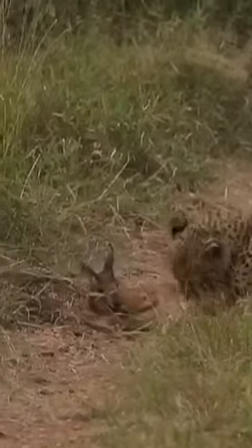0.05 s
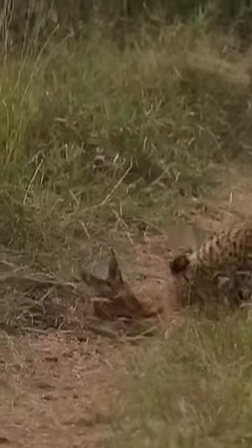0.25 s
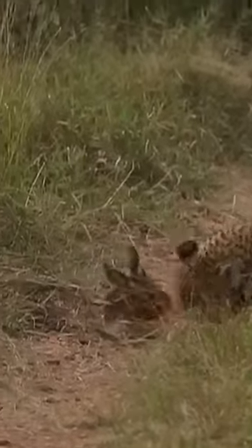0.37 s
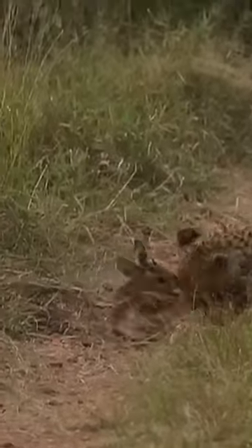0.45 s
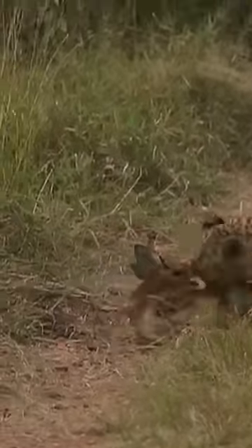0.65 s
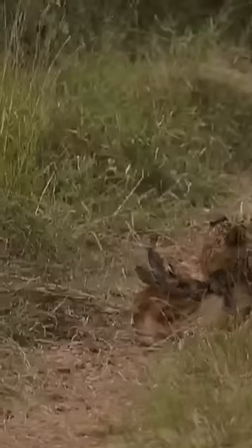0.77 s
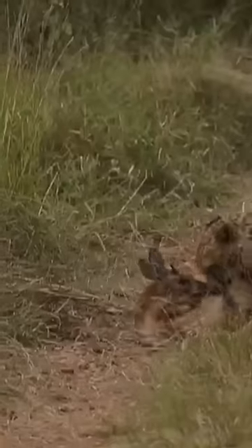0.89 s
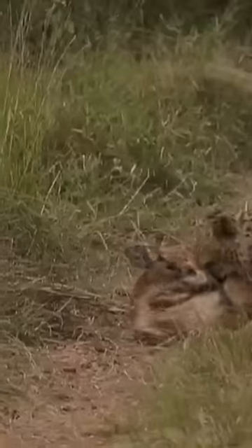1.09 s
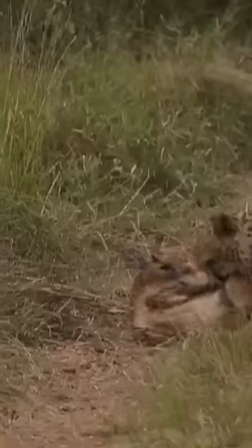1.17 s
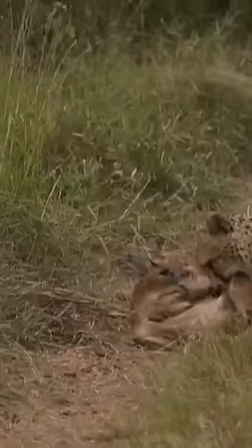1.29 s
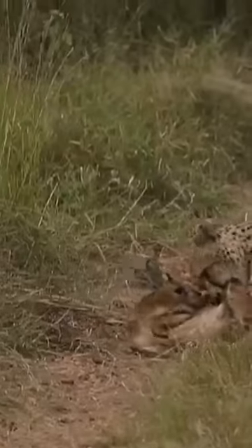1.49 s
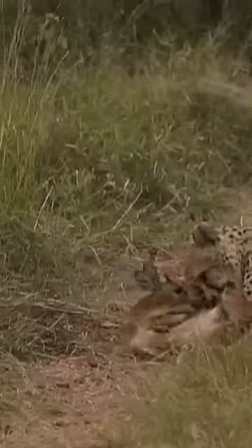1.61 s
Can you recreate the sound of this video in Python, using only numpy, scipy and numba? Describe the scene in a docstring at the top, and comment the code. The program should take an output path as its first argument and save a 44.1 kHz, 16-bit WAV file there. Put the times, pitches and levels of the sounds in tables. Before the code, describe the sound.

One long, piercing bleat from a small antelope ends raspily amid faint rustles and scuffs.

```python
"""Dry grass rustles over faint outdoor air; then a small antelope, seized by a big cat, gives one
long, loud distress bleat. Its pitch rises, holds, cracks upward and sags, and it ends in a rasp.
The voice is a source and a filter: pulses from the vocal folds excite throat resonances that move
as the mouth opens and closes. The struggle's rustle and closing scuffs are dense trains of tiny
impacts, and the vegetation scatters a short wash of echoes."""
import sys
import numpy as np
from scipy import signal
from scipy.fft import rfft, irfft
from scipy.io import wavfile
from scipy.ndimage import uniform_filter1d
from numba import njit

SR = 44100
rng = np.random.default_rng(int(sys.argv[2]) if len(sys.argv) > 2 else 0)


def store_wav(level_fs):
    """Save 16-bit WAV to argv[1]."""
    pcm = np.round(np.clip(np.atleast_2d(level_fs), -1, 1) * 32767)
    wavfile.write(sys.argv[1], SR, pcm.T.astype(np.int16))


N = 72765
T = np.arange(N) / SR

# Spectra of the air, grass and grit. Each row: frequency in Hz, relative level in dB.
AIR_SPECTRUM = [(25,-20),(60,-15),(110,-12),(200,-3),(450,-4),(700,-8),(1000,-7.5),(1400,-9.5),(3000,-32),(5000,-44),(8000,-21),(12000,-30)]
GRASS_SPECTRUM = [(120, -48), (200, -8.5), (903, -5), (984, 5.5), (1460, -0.5), (1560, -9), (1890, 1.5),
                  (3740, -2.5), (4600, -8), (8230, -7), (12000, -31.5), (15600, -57), (22000, -120)]
GRIT_SPECTRUM = [(120, -40), (200, -13), (589, -11), (1070, -2.5), (1820, -0.5), (2400, -8), (3210, 1.5),
                 (4080, -9.5), (8970, -11), (12000, -20.5), (15600, -60.5), (22000, -120)]
# Envelope of the rustling grass. Each row: time in seconds, level in dB.
RUSTLE_LEVEL = [(0,-56.5),(0.06,-58.5),(0.085,-50),(0.115,-63.5),(0.15,-51.5),(0.4,-70),(0.68,-60),(0.75,-44.5),(0.85,-42.5),(0.92,-53),(1.03,-65),(1.1,-50),(1.34,-41.5),(1.445,-48),(1.468,-57),(1.5,-45),(1.525,-53.5),(1.605,-47.5),(1.645,-61)]
# Fundamental of the vocal folds. Each row: time in seconds, frequency in Hz.
PITCH = [(0.18, 417.2), (0.205, 424.6), (0.3, 475.5), (0.335, 488.4), (0.385, 500.7), (0.43, 505.9),
         (0.465, 514.6), (0.52, 519), (0.56, 514.8), (0.625, 515.7), (0.68, 509.8), (0.77, 513.9),
         (0.835, 510.1), (0.868, 512), (0.888, 532), (0.918, 520.2), (0.948, 530.3), (0.968, 515.8),
         (0.995, 516), (1.04, 501.7), (1.115, 485.6), (1.22, 490.5), (1.25, 477.6), (1.28, 447.6),
         (1.32, 426)]
# Hoarseness. Each row: time in seconds, breath noise in dB relative to the pulses,
# depth of period doubling from 0 to 1.
HOARSENESS = [(0.178,-6.5,0),(0.192,-17,0.05),(0.285,-21,0),(0.33,-34.5,0),(0.53,-29,0),(0.58,-31,0.08),(0.65,-33,0),(0.78,-40,0.01),(0.825,-24.5,0),(0.85,-33,0.13),(0.876,-24,0),(0.9,-34,0),(1.04,-26,0),(1.085,-15,0.08),(1.115,-39,0.1),(1.16,-12,0),(1.22,-20,0),(1.275,-12.5,0),(1.3,-3.5,0.3)]
# Nasal anti-resonance. Each row: time in seconds, centre in Hz.
NASAL_DIP = [(0.2,2160),(0.32,2373),(0.43,2533),(0.55,2370),(0.8,2440),(0.92,2196),(1.0,1800),(1.1,2446),(1.16,2374),(1.225,2950),(1.28,2340)]
# Throat resonances; the first follows the mouth, the second is piercing.
# Each row: time in seconds, centre in Hz, relative level in dB.
FORMANT_1 = [(0.192,1420,-2),(0.258,1440,2.5),(0.382,1707,2.5),(0.5,1900,-4.5),(0.62,2060,-7.5),(0.77,2110,-0.5),(0.84,1870,1),(0.912,1920,-14.5),(0.99,1600,-5.5),(1.06,1595,-0.5),(1.19,1660,-2.5),(1.275,1503,2.5),(1.32,1300,3)]
FORMANT_2 = [(0.19,3160,-13),(0.27,2950,-3.5),(0.38,3070,-3),(0.5,3130,0),(0.57,3240,-3),(0.63,3180,0.5),(0.74,2920,1),(0.82,3420,-6.5),(0.882,2960,2),(0.988,3015,9.5),(1.05,3130,-2.5),(1.12,3320,3),(1.21,3290,-3),(1.255,2860,-7),(1.28,2546,-3.5),(1.311,2520,-4)]
FORMANT_3 = [(0.19,4200,-12),(0.27,4240,-5.5),(0.38,4550,-2.5),(0.5,4460,-6),(0.62,4090,-3.5),(0.72,4470,-6.5),(0.82,4640,-7.5),(0.95,4700,-9.5),(1.08,3840,-2.5),(1.19,3810,-3.5),(1.3,4260,-9.5)]
FORMANT_4 = [(0.19,6160,-16),(0.36,5900,-2),(0.46,6150,-10),(0.52,6440,-15),(0.56,5000,-4.5),(0.61,5940,-6),(0.69,4870,-40),(0.82,6600,-12),(0.95,5700,-16),(1.08,5260,-8.5),(1.22,5500,-8),(1.3,5900,-9.5)]
FORMANT_5 = [(0.19,7350,-11),(0.27,7720,-5),(0.38,6910,-8),(0.52,6690,-5.5),(0.6,6670,-9),(0.69,7500,-21.5),(0.81,7750,-11),(0.92,7500,-17),(0.99,7300,-8.5),(1.07,8340,-13),(1.21,7930,-12.5),(1.3,8300,-15.5)]
# Thin top band of the voice. Each row: time in seconds, relative level in dB.
SHEEN_LEVEL = [(0.28,-46),(0.38,-37),(0.66,-27.5),(0.82,-17),(1.0,-30),(1.09,-29),(1.22,-25)]
# Envelope of the resonant part of the cry. Each row: time in seconds, level in dB.
CRY_LEVEL = [(0.172, -44), (0.182, -32.5), (0.2, -28.5), (0.265, -22.5), (0.305, -21), (0.37, -16.1),
             (0.53, -16.5), (0.56, -20.0), (0.625, -15), (0.675, -18), (0.745, -14.5), (0.8, -19.5),
             (0.85, -20.5), (0.878, -15), (0.92, -14), (0.958, -12.5), (1.005, -15.5), (1.025, -19.5),
             (1.27, -20), (1.3, -28), (1.335, -41.5)]
# Two clean low partials. Each row: time in seconds, relative levels of the first and second in dB.
LOW_PARTIALS = [(0.18, -39, -35), (0.202, -60.5, -31), (0.25, -51, -55), (0.272, -57, -44.5),
                (0.326, -47.5, -41), (0.466, -46.5, -32.5), (0.816, -42.5, -33), (0.932, -37, -79),
                (1.04, -40.5, -33.5), (1.176, -42.5, -30), (1.31, -50, -42), (1.335, -59, -53)]
# Grunts of the throat. Each row: time of the peak in seconds, level in dB, centre in Hz.
GRUNTS = [(0.179,-39,600),(1.3,-38.5,1160),(1.316,-33,1020)]
# Scuffs of bodies on dry ground. Each row: time of the peak in seconds, relative level in dB.
SCUFFS = [(1.39,-36.5),(1.437,-32),(1.4845,-25),(1.548,-34),(1.575,-36.5)]


def from_db(db):
    """Amplitude grows tenfold for every 20 dB."""
    return 10 ** (np.asarray(db) / 20)


def curves(rows):
    """Linear interpolation in time gives one curve for each value column."""
    times, *columns = np.transpose(rows)
    return [np.interp(T, times, column) for column in columns]


def unit_rms(x):
    """Division by the root mean square gives unit power."""
    return x / np.sqrt(np.mean(x ** 2) + 1e-20)


def levelled(x, samples=500):
    """Division by the running root mean square holds the short-term power near one."""
    power = uniform_filter1d(uniform_filter1d(x ** 2, samples), samples)
    return x / np.sqrt(np.abs(power) + 1e-20)


def coloured(x, spectrum):
    """Filtering is multiplication of spectra; the result has unit power."""
    hz, db = np.transpose(spectrum)
    bin_hz = np.maximum(np.fft.rfftfreq(N, 1 / SR), 1)
    gain = from_db(np.interp(np.log(bin_hz), np.log(hz), db))
    return unit_rms(irfft(rfft(x) * gain, N))


def outdoor_air(level_db=-54):
    """Stationary noise, weighted toward low frequencies, is heard as a steady hush."""
    return from_db(level_db) * coloured(rng.standard_normal(N), AIR_SPECTRUM)


def crackle(spectrum, snaps_per_s=6000, spread_db=5):
    """Independent tiny snaps of stalks or grit add up to shot noise."""
    snaps = (rng.random(N) < snaps_per_s / SR) * rng.choice([-1, 1], N)
    strength = from_db(spread_db * np.minimum(rng.exponential(1, N), 4))
    return coloured(snaps * strength, spectrum)


def grass_rustle():
    """The struggle modulates the amplitude of the shot noise from the stalks."""
    return from_db(curves(RUSTLE_LEVEL)[0]) * crackle(GRASS_SPECTRUM)


def vegetation_scatter(x, t60_s=.18, wash_db=-14, treble_db=-11.5, treble_hz=5100):
    """Scattering by grass and bushes gives a decaying wash; thin stalks return more of the treble."""
    tail = rng.standard_normal(N) * from_db(-60 * T / t60_s) * (T > .002)
    wash = signal.fftconvolve(x, tail / np.sqrt(np.sum(tail ** 2)))[:N]
    treble = signal.sosfilt(signal.butter(3, treble_hz, "high", fs=SR, output="sos"), wash)
    return from_db(wash_db) * wash + from_db(treble_db) * treble


def drift(hz):
    """Low-passed noise of unit power wanders at rates up to about the cutoff."""
    return unit_rms(signal.sosfilt(signal.butter(2, hz, fs=SR, output="sos"), rng.standard_normal(N)))


def harmonic(phase, hz, flicker_db=4, flicker_rad=0.64, rate_hz=17, full_depth_hz=5560):
    """Random amplitude and phase modulation makes a partial flicker, the high ones most."""
    depth = np.minimum(hz / full_depth_hz, 1) ** 2
    gain = from_db(depth * flicker_db * drift(rate_hz))
    return gain * np.cos(phase + depth * flicker_rad * drift(rate_hz))


def vocal_folds(harmonics=26, clean_jitter=.0008, rasp_jitter=0.0355, jitter_rate_hz=126):
    """Vibrating folds chop the breath into pulses and puffs; hoarseness makes the period irregular."""
    pitch_hz, = curves(PITCH)
    breath_db, doubling = curves(HOARSENESS)
    breath = from_db(breath_db)
    jitter = (clean_jitter + rasp_jitter * breath) * drift(jitter_rate_hz)
    phase = 2 * np.pi * np.cumsum(pitch_hz * (1 + jitter)) / SR
    pulses = unit_rms(sum(harmonic(k * phase, k * pitch_hz) for k in range(1, harmonics + 1)))
    puffs = rng.standard_normal(N) * (1 + .5 * np.cos(phase))
    alternation = 1 + doubling * np.cos(phase / 2)   # strong and weak pulses take turns
    return pulses * alternation + breath * puffs, phase


@njit
def band_pass(x, centre_hz, width_hz):
    """A damped two-pole resonator passes a band around its moving centre."""
    w = 2 * np.pi * centre_hz / SR
    r = np.exp(-np.pi * width_hz / SR)
    y = np.zeros(len(x))
    for i in range(2, len(x)):
        y[i] = (1 - r * r) / 2 * (x[i] - x[i - 2]) + 2 * r * np.cos(w[i]) * y[i - 1] - r * r * y[i - 2]
    return y


def resonance(x, hz, stage_width_hz):
    """Two resonators in cascade steepen the skirts of a peak; the output is held at unit level."""
    centre_hz = hz * np.ones(N)
    once = band_pass(x, centre_hz, stage_width_hz)
    return levelled(band_pass(once, centre_hz, stage_width_hz))


def vocal_tract(source, sheen_hz=10030):
    """A nasal anti-resonance cuts a notch; five moving formants and a top band resonate in parallel."""
    notched = source - band_pass(source, curves(NASAL_DIP)[0], width_hz=118)
    voice = from_db(curves(SHEEN_LEVEL)[0]) * resonance(notched, sheen_hz, stage_width_hz=1170)
    for formant, stage_width_hz in ((FORMANT_1, 574), (FORMANT_2, 537), (FORMANT_3, 830),
                                    (FORMANT_4, 880), (FORMANT_5, 1020)):
        hz, db = curves(formant)
        voice += from_db(db) * resonance(notched, hz, stage_width_hz)
    return levelled(voice)


def bleat(start_s=.171, end_s=1.325, attack_s=0.0095, release_s=0.0099):
    """The tract filters the folds' pulses, above two low partials that weaken with hoarseness."""
    source, phase = vocal_folds()
    cry = from_db(curves(CRY_LEVEL)[0]) * vocal_tract(source)
    first_db, second_db = curves(LOW_PARTIALS)
    first = from_db(first_db - 3) * np.cos(phase)
    second = from_db(second_db - 2.5) * np.cos(2 * phase)
    low_partials = -np.sqrt(2) * (first + second)
    clarity = 1 - np.clip(from_db(curves(HOARSENESS)[0]), 0, 1)
    attack = np.clip((T - start_s) / attack_s, 0, 1)
    release = np.exp(-np.maximum(T - end_s, 0) / release_s)
    return attack * release * (cry + clarity * low_partials)


def grunts(half_length_s=0.0072):
    """Brief noise excites a low resonance as the throat opens and shuts at the ends of the cry."""
    breath = rng.standard_normal(N)
    bursts = np.zeros(N)
    for peak_s, db, hz in GRUNTS:
        envelope = from_db(db) * np.exp(-((T - peak_s) / half_length_s) ** 2)
        bursts += envelope * resonance(breath, hz, stage_width_hz=580)
    return bursts


def ground_scuffs(gain_db=-6.5, rise_s=0.0017, decay_s=0.0081):
    """Friction of bodies on dry ground gives bursts of grit noise that rise and decay exponentially."""
    envelope = np.zeros(N)
    for peak_s, db in SCUFFS:
        burst = np.exp(-np.maximum((peak_s - T) / rise_s, (T - peak_s) / decay_s))
        envelope += from_db(db + gain_db) * burst
    return envelope * crackle(GRIT_SPECTRUM)


def scene():
    """Cry, struggle, air and echoes add by superposition, alike in both channels."""
    animals = bleat() + grunts() + grass_rustle() + ground_scuffs()
    return np.tile(animals + outdoor_air() + vegetation_scatter(animals), (2, 1))


def record(dry):
    """An elliptic low-pass filter cuts the highest treble steeply."""
    cutoff_hz = 12000
    return signal.sosfilt(signal.ellip(12, .1, 80, cutoff_hz, fs=SR, output="sos"), dry)


dry = scene()
out = record(dry)
store_wav(out)
```